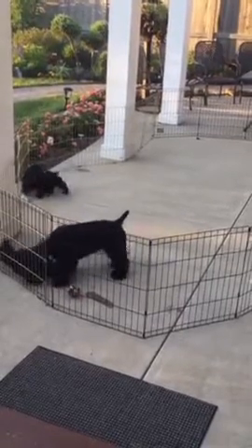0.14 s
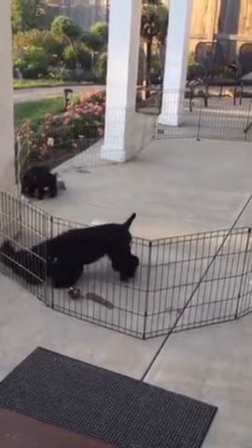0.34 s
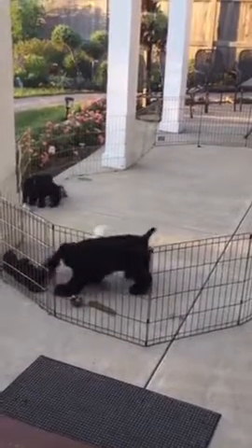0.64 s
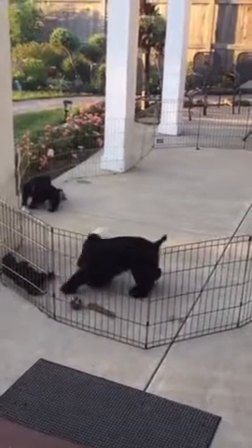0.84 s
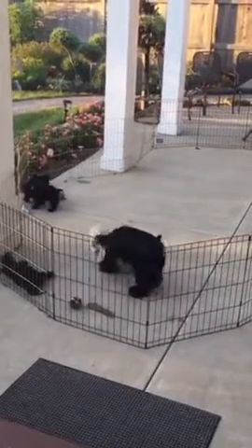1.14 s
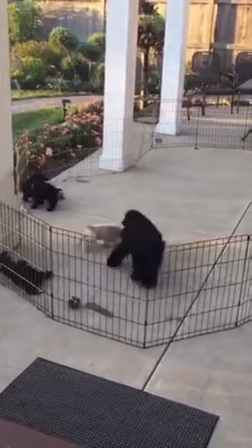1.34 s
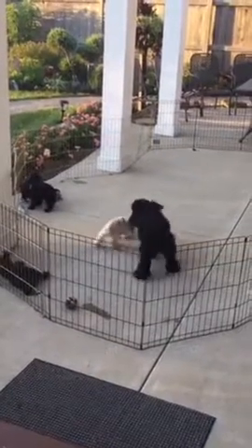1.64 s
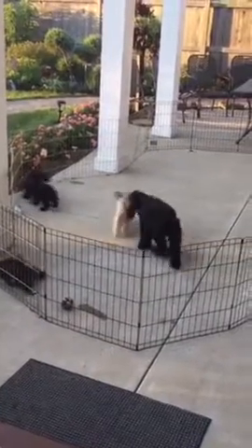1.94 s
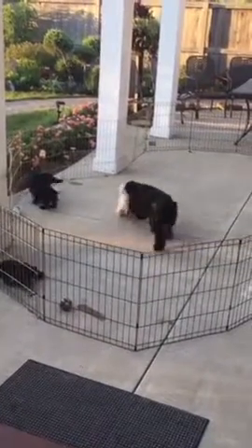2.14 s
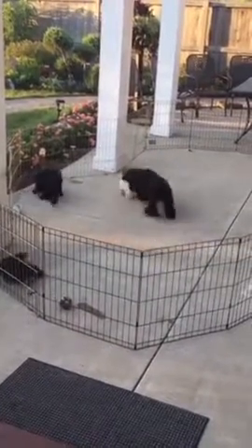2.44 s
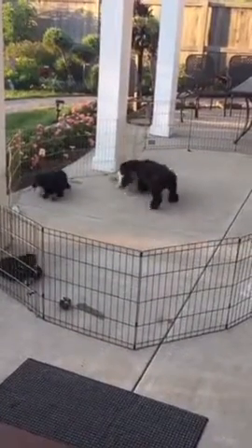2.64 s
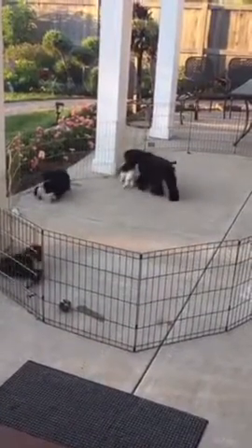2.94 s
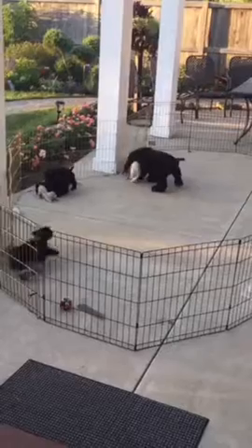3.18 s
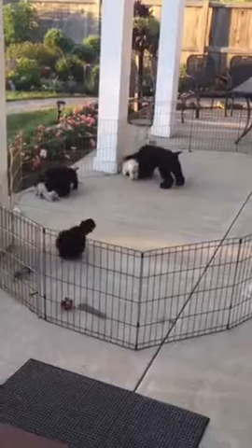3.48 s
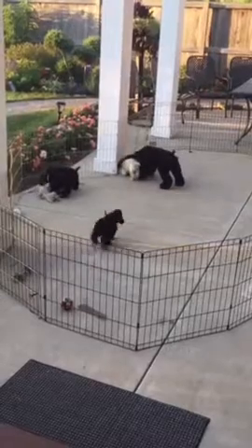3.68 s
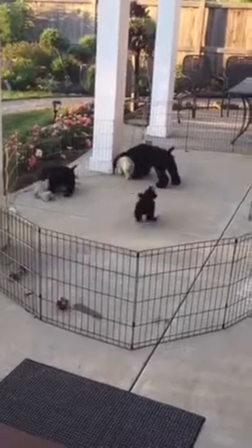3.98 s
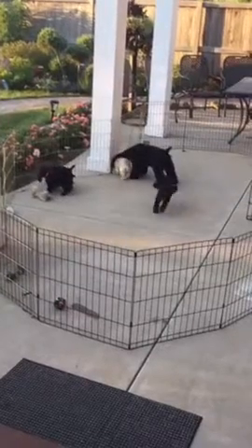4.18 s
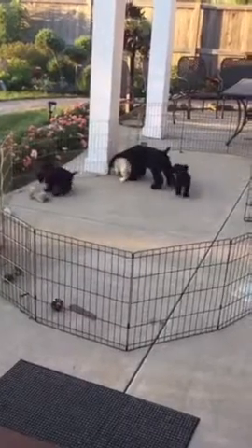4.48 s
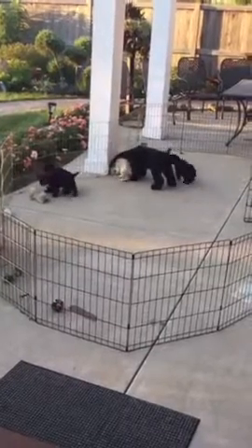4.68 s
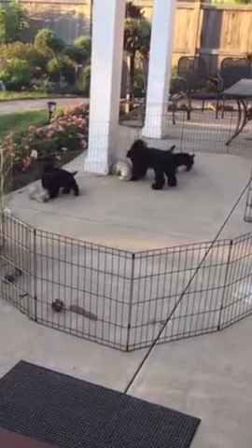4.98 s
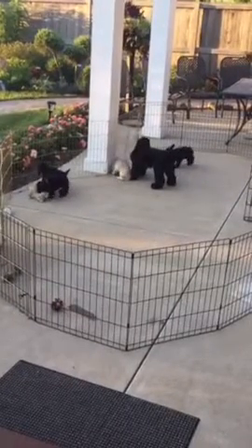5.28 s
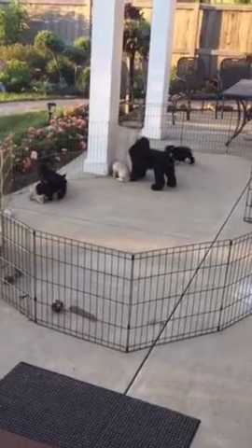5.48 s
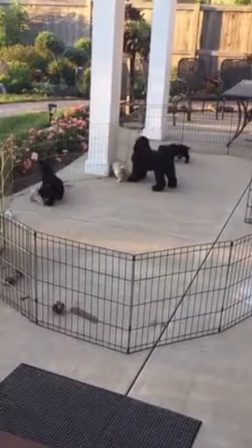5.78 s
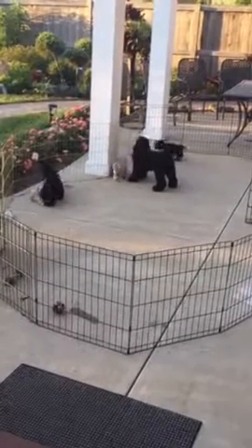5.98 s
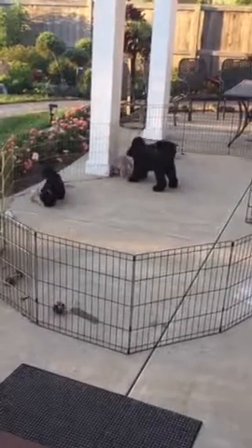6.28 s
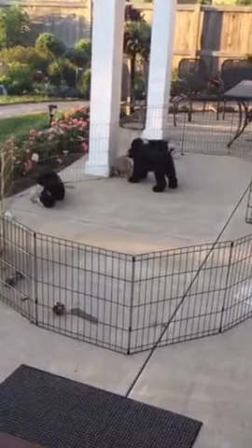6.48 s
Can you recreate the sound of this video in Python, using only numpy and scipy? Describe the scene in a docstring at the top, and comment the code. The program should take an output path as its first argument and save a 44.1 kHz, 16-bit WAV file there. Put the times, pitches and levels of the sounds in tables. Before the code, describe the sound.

Muffled, stuttering growls from a playing dog come and go on a quiet patio, with a gruff huff, soft thumps and distant crickets.

```python
"""A dog growls in play on a concrete patio: six low growls with the mouth nearly shut, tugging at a toy among puppies.
Uneven fold beats make a hum through the shut muzzle and rasp at the lips; each growl flutters as the voice catches.
Soft grumbles, one gruff huff and low thumps, made of dying modes, fall between and after them.
Paws scuff the concrete as filtered crackle, and crickets trill in the garden as pulsed wing tones.
Filtered noise gives a faint outdoor rumble, and the house wall answers with a short diffuse tail."""
import sys
import numpy as np
from scipy import signal
from scipy.fft import rfft, irfft, next_fast_len
from scipy.io import wavfile
from scipy.ndimage import uniform_filter1d

SR = 44100
rng = np.random.default_rng(int(sys.argv[2]) if len(sys.argv) > 2 else 0)


def wrap_up_sound(samples):
    """Save the sound to the file named by the first command line argument, as 16-bit audio."""
    columns = np.atleast_2d(samples).T
    # keep every value between -1 and 1, then stretch to whole-number steps
    tamed = np.clip(columns, -1, 1)
    steps = np.round(tamed * 32767).astype(np.int16)
    wavfile.write(sys.argv[1], SR, steps)


N = 291942  # length in samples
TIME = np.arange(N) / SR


def amp(db):
    """Logarithmic level: decibels become a linear gain."""
    return 10 ** (np.asarray(db) / 20)


def evened(x):
    """Power normalization: scales to rms 1."""
    return x / np.sqrt(np.mean(x ** 2) + 1e-20)


def read(points, hz):
    """Spectral interpolation: reads a table along a log-frequency axis."""
    f, value = np.transpose(points)
    return np.interp(np.log(hz + 1), np.log(f + 1), value)


def add(mix, s, sound):
    """Superposition: mixes a sound in at time s."""
    part = mix[round(s * SR):][:len(sound)]
    part += sound[:len(part)]


def colour(x, points, tilt_db=0):
    """Linear filtering: weights the spectrum by a table, tilted in dB per octave above its lowest frequency."""
    size = next_fast_len(len(x) + 2048)
    hz = np.fft.rfftfreq(size, 1 / SR)
    lowest_hz = np.min(points, 0)[0]
    gain_db = read(points, hz) + tilt_db * np.log2(np.maximum(hz, lowest_hz))
    return irfft(rfft(x, size) * amp(gain_db), size)[:len(x)]


def wander(size, hz):
    """Low-passed chance: smooth noise, moving mostly slower than hz, scaled to rms 1 before it is cut to size."""
    padded = next_fast_len(size + SR // 2)
    f = np.fft.rfftfreq(padded, 1 / SR)
    smooth = irfft(rfft(rng.standard_normal(padded)) / (1 + (f / hz) ** 2) ** 2, padded)
    return evened(smooth)[:size]


def resonate(x, hz, width_hz):
    """Two-fold resonance; to follow a curve it shifts the sound to zero, smooths twice and shifts back."""
    r = np.exp(-np.pi * width_hz / SR)
    if np.ndim(hz) == 0:
        pole = r * np.exp(2j * np.pi * hz / SR)
        return 2 * signal.lfilter([(1 - r) ** 2], [1, -2 * pole, pole ** 2], x).real
    turn = np.exp(2j * np.pi * np.cumsum(hz) / SR)
    smoothed = signal.lfilter([(1 - r) ** 2], [1, -2 * r, r * r], x / turn)
    return 2 * (turn * smoothed).real


# Reverberation of the patio. Each row: frequency in Hz, decay time t60 in seconds.
PATIO_DECAY = [(100, 0.23), (1000, 0.31), (5000, 0.43), (14000, 0.033)]


def patio(x):
    """Diffuse reverberation: wall, pillars and roof return a short tail; the bass mostly escapes."""
    hz, t, z = signal.stft(rng.standard_normal(SR // 2), SR, nperseg=256)
    decay = amp(-60 * t / read(PATIO_DECAY, hz)[:, None])
    tail = signal.istft(z * decay, SR, nperseg=256)[1]
    delay = np.zeros(round(.006 * SR))
    tail = np.concatenate([delay, tail / np.linalg.norm(tail)])
    return colour(signal.fftconvolve(x, tail)[:N], [(250, -13), (600, 0.5)])


# Spectrum of the outdoor air. Each row: frequency in Hz, relative density in dB per Hz.
AIR_SPECTRUM = [(20, -51), (45, -7), (80, 2.5), (130, -1), (220, -5), (420, -15.5), (750, -20.5),
                (1100, -18), (1700, -24.5), (3300, -36), (7500, -34.5), (9800, -39), (11300, -35),
                (15000, -47.5)]
AIR_DB = -62  # rms level before the slow swell


def air(swell_db=0.68):
    """Broadband noise: distant rumble and leaf hiss, swelling a little."""
    noise = evened(colour(rng.standard_normal(N), AIR_SPECTRUM))
    return amp(AIR_DB) * noise * amp(swell_db * wander(N, 2.4))


def cricket(hz, width_hz, rate, db, glide=0.041, scrape=0.97, throb_db=2.5, sharpness=1.74, waver=.3):
    """Stridulation: each stroke drags a file over the ringing wing, its tone falling through the stroke."""
    stroke = np.cumsum(rate * (1 + 0.0046 * wander(N, 5.4))) / SR % 1
    opening = abs(np.sin(np.pi * stroke)) ** sharpness
    tone_hz = hz * (1 - glide * (stroke - .5)) + width_hz * waver * wander(N, 80.4)
    tone = np.sin(2 * np.pi * np.cumsum(tone_hz) / SR)
    ring = evened(resonate(rng.standard_normal(N), hz, 2 * width_hz))
    throb = amp(throb_db * evened(resonate(rng.standard_normal(N), 11.1, 6.8)))
    return amp(db) * evened((tone + scrape * ring) * opening * throb)


# The crickets. Each row: mean wing tone in Hz, nominal width in Hz, mean strokes a second,
# level in dB before the chorus swell.
CRICKETS = [(5734, 65, 86, -74.5), (5500, 40, 77, -77), (5317, 45, 75.6, -78), (5680, 280, 76.6, -74.5),
            (4866, 610, 55, -83)]
# Growth of the chorus. Each row: time in seconds, gain in dB.
CHORUS_SWELL = [(0, -.4), (4.6, 0), (6.6, 2.3)]


def cricket_chorus():
    """Incoherent superposition: independent crickets add, and the chorus grows."""
    swell = amp(np.interp(TIME, *np.transpose(CHORUS_SWELL)))
    return swell * sum(cricket(*row) for row in CRICKETS)


# Spectrum of the gritty noise. Each row: frequency in Hz, relative level in dB.
GRIT_SPECTRUM = [(600, -72), (1300, -5.5), (3500, 0), (6500, 0), (9500, 3), (13500, 4.5), (15500, -6)]
# Paws and toy on the concrete, with short rasping bursts of the snarls at .404 and 2.24 s.
# Each row: start in seconds, length in seconds, level in dB before the stroke shapes it,
# decay time t60 in seconds, brightness in dB per octave.
SCUFFS_AND_BURSTS = [(0.382, 0.019, -68, 0.42, -12), (.404, .004, -61, .09, -11),
                     (0.643, .008, -67.5, 0.33, -2), (0.888, 0.019, -66.5, 0.3, -6),
                     (1.174, 0.0076, -60.5, 0.085, 11), (1.326, 0.15, -67.5, 0.17, -4),
                     (1.443, .006, -64, 0.14, 9), (1.502, 0.02, -64, 0.099, -0.5),
                     (1.686, 0.017, -64.5, 0.21, 2), (2.018, 0.022, -67, 0.2, -4),
                     (2.195, 0.027, -63.5, 0.19, -2.5), (2.24, 0.014, -61.5, .04, -15),
                     (2.262, 0.0017, -55, 0.022, 3), (2.42, 0.04, -68, 0.2, -6),
                     (2.477, 0.018, -64, 0.21, 8), (2.547, 0.029, -72, 0.17, 3),
                     (2.627, 0.019, -69, 0.13, -1), (2.794, 0.011, -65, 0.12, -3),
                     (4.363, .03, -65.5, 0.1, -15), (4.418, 0.017, -69.5, .1, 9),
                     (4.442, 0.037, -64, 0.088, 9)]


def scuff(s, length, db, t60, tilt_db, grain_db=2.5, tick_db=18, ticks_per_s=110):
    """Friction noise: grit crackles and a few large grains tick, then die away; it also makes short snarl bursts."""
    t = np.arange(round((length + t60) * SR)) / SR
    grains = rng.standard_normal(len(t)) * amp(grain_db * wander(len(t), 130))
    ticking = rng.random(len(t)) < ticks_per_s / SR
    grains += amp(tick_db) * rng.standard_normal(len(t)) * ticking
    stroke = np.minimum(t / (.5 * length), 1) * amp(-60 * np.maximum(t - length, 0) / t60)
    return s, amp(db) * stroke * evened(colour(grains, GRIT_SPECTRUM, tilt_db))


# Modes of a thump. Each row: mean frequency in Hz before chance detuning, relative level in dB,
# decay time t60 in seconds.
THUMP_MODES = [(90, -1, 0.12), (128, -2.5, 0.1), (203, -11, 0.044)]
# Soft low thumps. Each row: start in seconds, level in dB that the mode levels add to.
THUMPS = [(3.998, -47), (4.045, -45), (5.706, -52), (5.881, -48.5), (5.967, -53), (6.192, -53),
          (6.435, -56), (6.465, -55)]
THUMP_RISE_S = 0.0073


def thump(s, db):
    """Modal decay: a soft, dull knock whose few low modes die away quickly."""
    t = np.arange(SR // 5) / SR
    ring = np.zeros(len(t))
    for hz, level, t60 in THUMP_MODES:
        cycles = hz * rng.uniform(.9, 1.07) * t + rng.random()
        ring += amp(level - 60 * t / t60) * np.sin(2 * np.pi * cycles)
    return s, amp(db) * np.minimum(t / THUMP_RISE_S, 1) * ring


# Upper resonances of throat and muzzle with the lips at rest. Each row: frequency in Hz, width in Hz,
# level in dB before the mouth's own setting and flicker.
THROAT = [(1620, 330, -19), (2080, 270, -14), (2380, 300, -20), (3390, 400, -23.5), (4310, 400, -24),
          (9000, 4000, -37)]
REST_LIPS_HZ = 1050
THROAT_FOLLOW = 0.29  # octaves that they rise for an octave of the lips resonance


def throat(x, jaw_hz, lips_hz, lips_db, upper_db, jaw_db=5, jaw_width_hz=190, lips_width_hz=310,
           split=.095, flicker_db=3.5, drift=.04):
    """Formants: jaw and lips each move one, the upper ones follow, drift and flicker with the tongue."""
    # a close pair of lips resonances makes one broad, steep-sided band
    lower_lips = resonate(x, lips_hz * (1 - split), lips_width_hz)
    pair = 2 * resonate(lower_lips, lips_hz * (1 + split), lips_width_hz)
    y = amp(jaw_db) * resonate(x, jaw_hz, jaw_width_hz) + amp(lips_db) * pair
    stretch = (lips_hz / REST_LIPS_HZ) ** THROAT_FOLLOW * (1 + drift * wander(len(x), 9))
    for hz, width_hz, db in THROAT:
        gain = amp(db + upper_db + flicker_db * wander(len(x), 12))
        y += gain * resonate(x, hz * stretch, width_hz)
    running_power = abs(uniform_filter1d(y ** 2, size=1500))
    return y / np.sqrt(running_power + 1e-12)  # held near rms 1


def voice(hz, rough, mouth_db, lips_hz=1050, jaw_hz=550, lips_db=-3, upper_db=0, jitter=0.068, shimmer=0.34,
          second_db=-17, murmur_hz=300, rasp=1.0, tear=.6, doubling=.55, puff_depth=.55,
          nasal_db=-14, nasal_hz=245, nasal_width_hz=80):
    """Source and filter: uneven fold beats hum through the shut muzzle; torn overtones and rasp pass the lips."""
    size = len(hz)
    unsteady = evened(resonate(rng.standard_normal(size), 68.6, 58))
    phase = 2 * np.pi * np.cumsum(hz * (1 + jitter * rough * unsteady)) / SR
    nose = 1 / np.sqrt(1 + (2 * hz / murmur_hz) ** 14)  # the octave sounds only while it is low enough for the nose
    hum = np.sqrt(2) * (np.sin(phase) + amp(second_db) * nose * np.sin(2 * phase))
    beats = rough * evened(resonate(rng.standard_normal(size), 75.3, 50))  # strong and weak beats
    hum *= 1 + shimmer * beats
    puffs = evened(rng.standard_normal(size) * (1 + puff_depth * np.cos(phase)) ** 2)  # air escapes once a beat
    hum += rough * amp(nasal_db) * evened(resonate(puffs, nasal_hz, nasal_width_hz))

    closing = phase + 0.3 * rough * wander(size, 90)  # the folds snap shut a little early or late
    pulses = sum(np.cos(k * closing) for k in range(2, 20))
    pulses *= np.maximum(1 + tear * beats, 0)
    pulses *= 1 + doubling * rough * np.cos(phase / 2)  # in a rough voice every other beat is weak
    share = np.clip(rasp * rough, 0, 1) ** 2  # rasp's share of the power at the lips
    shape = jaw_hz, lips_hz, lips_db, upper_db
    lips = np.sqrt(1 - share) * throat(pulses, *shape) + np.sqrt(share) * throat(puffs, *shape)
    return hum + amp(mouth_db + 2.0 * wander(size, 31)) * lips


# Spectrum of the huff's rasp. Each row: frequency in Hz, relative level in dB.
HUFF_SPECTRUM = [(200, -1), (340, 5), (480, -1), (750, -2), (950, -21), (1400, -8), (1750, -18),
                 (2600, -38), (6000, -40)]
# The gruff huff. One row: start in seconds, length in seconds, voice gain in dB, base pitch in Hz,
# rasp level in dB before the blow shapes it.
HUFF = (4.608, .18, -52.8, 208, -49.3)
HUFF_RISE_S, HUFF_T60_S = .048, .36  # the rasp swells, then dies away


def huff(s, length, hum_db, hz, rasp_db, arch=0.143, jitter=0.035, voiced=0.65):
    """Breath pressure: a push of air raises the pitch, with ragged fold beats and rasp over a short hum."""
    t = np.arange(round(length * SR)) / SR
    fall = amp(-60 * np.maximum(t - HUFF_RISE_S, 0) / HUFF_T60_S)
    blow = np.minimum(t / HUFF_RISE_S, 1) ** 2 * fall
    pitch = hz * (1 + arch * (blow - .5))
    phase = 2 * np.pi * np.cumsum(pitch * (1 + jitter * wander(len(t), 148))) / SR
    fold_beats = evened(sum(np.cos(k * phase) for k in range(2, 20)))
    drive = voiced * fold_beats + rng.standard_normal(len(t))
    rasp = evened(colour(drive * (1 + 0.3 * wander(len(t), 100)), HUFF_SPECTRUM))
    sound = amp(hum_db) * voice(pitch, 0.6, -27) + amp(rasp_db) * blow * rasp
    return s, sound * signal.windows.tukey(len(t), .4)


# Soft grumbles around the growls. Each row: start in seconds, length in seconds, voice gain in dB before
# the swell and flutter, base pitch in Hz, glide in octaves a second.
GRUMBLES = [(0.424, 0.052, -57.5, 96, -2.5), (0.642, 0.12, -51.5, 133.6, 0.5),
            (0.746, 0.052, -57.5, 181, -5), (3.922, 0.095, -55, 170.4, 9), (4.227, 0.112, -58.5, 117.5, 5),
            (4.304, 0.21, -52.3, 136, -1.2)]


def grumble(s, length, db, hz, glide, rough=1.0, mouth_db=-22, arch=0.075, flutter=.3, flutter_hz=25):
    """Joint modulation: in a short, slack growl level and pitch flutter together as the pitch arches and glides."""
    swell = signal.windows.tukey(round(length * SR), .6)
    from_middle = np.arange(len(swell)) / SR - length / 2
    push = 1 + flutter * np.sin(2 * np.pi * (flutter_hz * from_middle + rng.random()))
    pitch = hz * 2 ** (glide * from_middle) * (1 + arch * (swell - 1)) * np.sqrt(push)
    return s, amp(db) * swell * push * voice(pitch, rough, mouth_db)


# Placed catches, from slight dips to near breaks; evenly spaced catches fill in between.
# Each row: time in seconds, nominal share of the level lost 0-1.
PLACED_CATCHES = [(.182, .76), (.21, .6), (.266, .75), (.314, .64), (.37, .75), (.973, .42), (1.033, .42),
                  (1.234, .7), (1.27, .86), (1.358, .51), (2.099, .87), (2.213, .85), (2.246, .9),
                  (2.284, .8), (2.313, .6), (2.363, .9), (2.408, .9), (2.458, .9), (2.549, .62),
                  (2.914, .76), (2.955, .76), (3.38, .65), (3.408, .76), (3.502, .63), (3.537, .5),
                  (3.636, .6), (3.678, .92), (3.726, .83), (3.769, 1), (3.815, .81), (4.96, .9),
                  (4.995, .85), (5.068, .8), (5.16, .8), (5.249, .68), (5.307, .82), (5.355, .75)]
CATCH_JITTER_S, CATCH_SPREAD = .0015, .1  # chance in the timing and in the depth of a filling catch


def catches(start, end, gap, filling_depth):
    """Intermittent phonation: about 25 catches a second, placed ones and evenly spaced filling: times and depths."""
    placed = [row for row in PLACED_CATCHES if start < row[0] < end]
    edges = [start, *(s for s, _ in placed), end]
    spans = []
    for a, b in zip(edges, edges[1:]):
        steps = max(round((b - a) / gap), 1)
        spans.append(np.linspace(a, b, steps + 1)[1:-1])
    filling = np.concatenate(spans)
    shift, deeper = rng.standard_normal(size=(40, 2))[:len(filling)].T
    filling_rows = zip(filling + CATCH_JITTER_S * shift, filling_depth + CATCH_SPREAD * deeper)
    at, depth = np.transpose(sorted([*placed, *filling_rows]))
    return at, np.clip(depth, 0, 1)


# Snarls, where the lips part for an instant. Each row: time in seconds, half length in seconds,
# extra opening in dB, extra roughness as a share 0-1 (negative is smoother).
SNARLS = [(.183, .004, 14.5, 0), (.41, .01, 11, 0), (.84, .005, 5, 0), (.945, .005, 11, .12),
          (1.21, .009, 3, .15), (1.242, .0087, 2, .25), (1.279, .008, 3, .25), (1.368, .004, 4, .14),
          (1.39, .0075, 3, .08), (2.103, .005, 6, .06), (2.25, .0078, 9, .15), (2.29, .012, 3, .09),
          (3.4, .015, 2, .25), (3.599, .014, 9, -.05), (4.99, .025, 3, .12)]
SNARL_ROUGH_S, SNARL_LIPS_SHARE = 0.047, 0.18  # a snarl roughens the voice around it and favours the lips resonance
# The arch of each growl, one list a growl. Each row: time in seconds, base pitch in Hz, base mouth opening in dB
# as level of the throat resonances, lips resonance in Hz, jaw resonance in Hz, upper resonances in dB.
ARCHES = [
    [(.11, 128, -14, 1080, 563, -1), (.19, 124, -19, 1050, 610, 0), (.25, 128, -25.5, 1060, 570, 0),
     (.43, 137, -26, 1060, 570, 2)],
    [(.82, 118, -15, 1060, 514, -1), (.89, 156, -15, 1110, 510, 1.5), (.94, 187, -19, 1090, 520, 1),
     (.99, 221, -16.5, 1000, 497, -6), (1.18, 222, -13, 1010, 488, 2), (1.24, 245, -12.5, 1040, 570, -1),
     (1.32, 216, -14, 1000, 500, 2), (1.385, 230, -13, 1190, 537, 0), (1.44, 197, -17, 1260, 640, 3),
     (1.525, 155, -12, 1250, 595, 3)],
    [(1.984, 137, -11, 1140, 560, -1), (2.055, 209, -24, 1130, 620, 1), (2.16, 199, -23, 1100, 570, 1),
     (2.26, 250, -15.5, 1090, 500, 0), (2.34, 231, -14, 1150, 470, 1), (2.41, 195, -18, 1160, 560, -1),
     (2.49, 188, -28, 1080, 615, 3), (2.545, 211, -23, 1100, 586, 2), (2.605, 169, -17, 1104, 560, 0)],
    [(2.79, 155, -22, 1050, 540, -4), (2.97, 157, -21.5, 1040, 620, -4), (3.04, 180, -30, 1070, 630, -4),
     (3.11, 146, -36, 1050, 600, -4)],
    [(3.337, 150, -15, 1120, 520, -4), (3.45, 181, -20, 1140, 540, -3), (3.595, 206, -25, 1180, 610, -3),
     (3.66, 187, -28, 1090, 564, -2), (3.872, 138, -25, 1010, 540, -2)],
    [(4.828, 135, -14.5, 1170, 530, -4), (4.98, 180, -21, 1290, 580, -5), (5.09, 155, -20, 1250, 640, -10),
     (5.28, 136, -26, 1180, 580, -8), (5.45, 122, -27, 1150, 540, -8)],
]
# The manner of each growl. Each row: attack in seconds, release in seconds, nominal gap between catches in seconds,
# mean share of the level lost in a filling catch 0-1, base gain in dB at MID_HZ, swell in dB per octave of pitch,
# base strength of the lips resonance in dB, base roughness at MID_HZ 0-1, octave overtone in dB re the fundamental
# before the nose weakens it.
GROWLS = [ (.014, .04, .035, .5, -39.5, 8.5, 2.5, .38, -22.5),
          (.042, .072, .038, .34, -38.9, 3.5, 4.8, .32, -9),
          (.042, .064, .038, .52, -39.9, 9.5, -.5, .42, -7.5), (.024, .052, .04, .5, -41, 16, -4, .36, -18),
          (.035, .07, .047, .55, -41.3, 13, 1.5, .27, -17), (.029, .075, .042, .68, -41.4, 18, 1, .4, -15),
          ]
MID_HZ = 170
ROUGH_PER_OCTAVE, ROUGH_IN_CATCH = -0.42, .24  # slack or stalling folds beat irregularly, tight ones evenly
REBOUND, REBOUND_S = .32, .012  # pent-up air makes the beats just after a catch stronger
SHUT_DB, MOUTH_S = -11, 0.024  # the mouth opens after the voice starts and shuts before it ends


def growl(arch, attack, release, gap, catch_depth, db, swell_db, lips_db, rough_mid, octave_db, catch_s=0.008,
          climb=0.25, slip_turns=.58, slip_s=0.006, lift=.03, leak_db=5, open_db=-1.5):
    """Fold tension and stall: higher is louder and cleaner; a catch dips the level and loses part of a beat."""
    s, *columns = np.transpose(arch)
    t = np.arange(s[0], s[-1], 1 / SR)
    hz, mouth_db, lips_hz, jaw_hz, upper_db = (np.interp(t, s, c) for c in columns)
    effort = np.log2(hz / MID_HZ)  # octaves
    fade = np.sin(np.pi / 2 * np.minimum((s[-1] - t) / release, 1)) ** 2
    envelope = np.minimum((t - s[0]) / attack, 1) * fade
    shut_db = SHUT_DB * np.exp(-np.minimum(t - s[0], s[-1] - t) / MOUTH_S)
    snarl_db = sum(extra * np.exp(-((t - when) / half) ** 2) for when, half, extra, _ in SNARLS)
    snarl_rough = sum(extra * np.exp(-((t - when) / SNARL_ROUGH_S) ** 2) for when, _, _, extra in SNARLS)

    at, depth = catches(s[0], s[-1], gap, catch_depth)
    since = t - at[:, None]
    stall = np.clip(depth @ (1 / (1 + (since / catch_s) ** 2) ** 2), 0, .9)
    rebound = REBOUND * depth ** 2 @ np.exp(-(2 * (since / REBOUND_S - 1)) ** 2)
    rough = rough_mid + ROUGH_PER_OCTAVE * effort + ROUGH_IN_CATCH * stall + snarl_rough
    rough = np.clip(rough, 0, 1)

    # each catch loses up to slip_turns of a beat, then the pitch climbs until the next
    lost_hz = slip_turns * depth ** 1.2 @ np.exp(-(since / slip_s) ** 2) / (slip_s * np.sqrt(np.pi))
    counts = [.5, *np.arange(1, len(at) + 1), len(at) + .5]
    progress = np.interp(t, [s[0], *at, s[-1]], counts) % 1  # 0 to 1 from catch to catch
    ramp = np.interp(t, at, depth) ** 2 * uniform_filter1d(2 * progress - 1, size=200)
    pitch = hz * (1 + lift + climb * ramp) - lost_hz

    opening_db = mouth_db + open_db + shut_db + snarl_db + leak_db * stall  # air keeps rasping while the hum stalls
    lips_now_db = lips_db + SNARL_LIPS_SHARE * snarl_db
    sound = voice(pitch, rough, opening_db, lips_hz, jaw_hz, lips_now_db, upper_db, second_db=octave_db)
    level = amp(db + swell_db * effort) * envelope * (1 - stall) * (1 + rebound)
    return s[0], level * sound


# How the voice leaves the nearly shut muzzle, with weak deep bass and nasal notches.
# Each row: frequency in Hz, gain in dB.
MUZZLE = [(20, -19), (45, -17), (80, 1), (115, 2), (290, 1), (360, -5.5), (450, 0), (630, -1.5),
          (770, -2.5), (930, 3), (1300, 1.2), (1550, -1.5), (2000, -.5)]


def scene():
    """Superposition: dogs and crickets sound directly and through the patio's tail, in the outdoor air."""
    voices, paws = np.zeros((2, N))
    for row in SCUFFS_AND_BURSTS:
        add(paws, *scuff(*row))
    for row in THUMPS:
        add(paws, *thump(*row))
    add(voices, *huff(*HUFF))
    for row in GRUMBLES:
        add(voices, *grumble(*row))
    for arch, row in zip(ARCHES, GROWLS):
        add(voices, *growl(arch, *row))
    # the snarl bursts travel with the paws, past the muzzle's filter
    direct = colour(voices, MUZZLE) + paws + cricket_chorus()
    return (direct + amp(-8.0) * patio(direct) + air())[None]


EDGE_HZ = 15300


def record(dry):
    """Band limiting: a linear-phase low-pass removes what lies above EDGE_HZ."""
    low_pass = signal.firwin(511, EDGE_HZ, window=("kaiser", 9), fs=SR)
    return signal.oaconvolve(dry, low_pass[None], "same")


dry = scene()
out = record(dry)
wrap_up_sound(out)
```